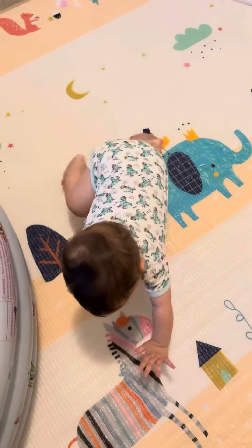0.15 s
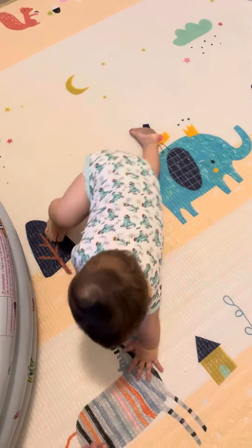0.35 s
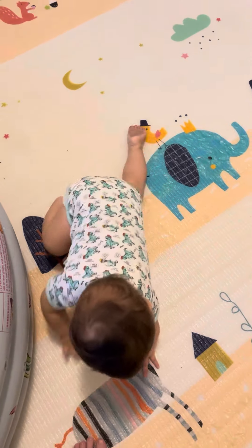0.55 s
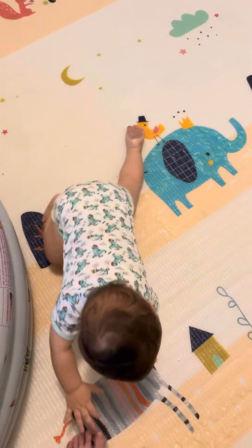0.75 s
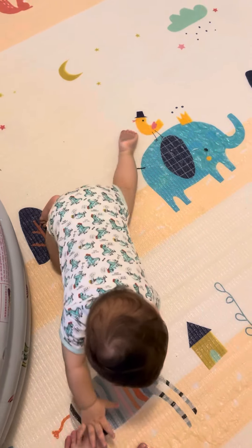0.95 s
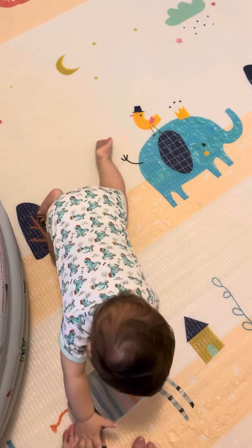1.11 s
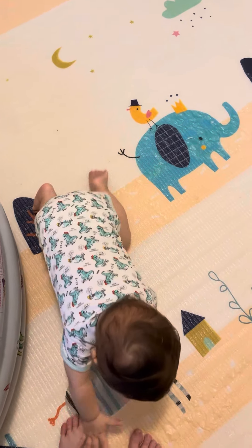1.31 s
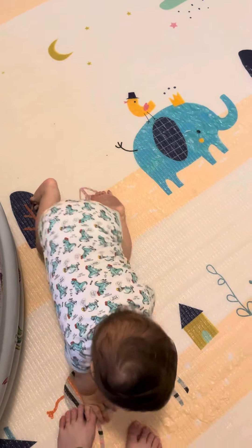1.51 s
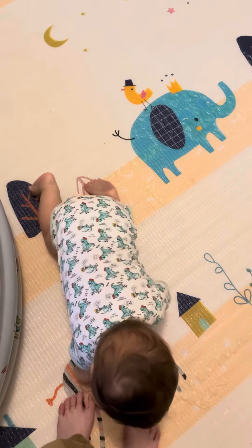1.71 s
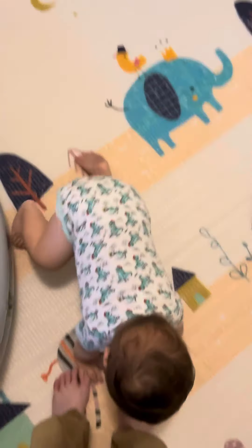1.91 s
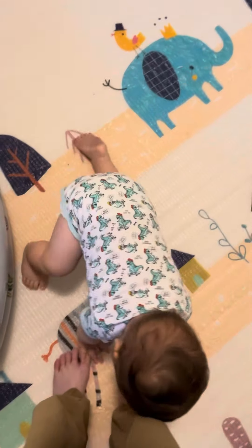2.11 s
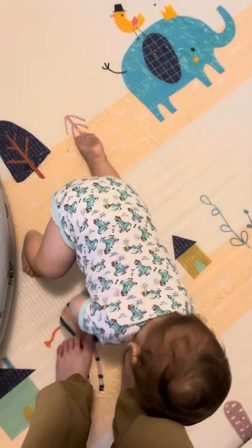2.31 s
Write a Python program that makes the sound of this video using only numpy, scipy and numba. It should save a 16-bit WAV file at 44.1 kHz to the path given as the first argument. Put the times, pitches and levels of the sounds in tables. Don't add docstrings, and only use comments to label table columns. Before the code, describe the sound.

Crawling thuds on a foam mat over a hollow floor, heard close in a quiet, softly humming room. Light scraping leads to a heavy, boomy palm slap at 0.25 s, then small pats until 0.7. Soft rubbing swells around 0.9-1.4, a moderate thud lands at 1.43, crisp skin peels near 1.7, brighter knocks at 1.9 and 2.07, and a last soft slap at 2.3.

```python
import sys
import numpy as np
from scipy import signal
from scipy.fft import rfft, irfft
from scipy.io import wavfile
from scipy.ndimage import uniform_filter1d
from numba import njit

SR = 44100
rng = np.random.default_rng(int(sys.argv[2]) if len(sys.argv) > 2 else 0)


def dump_mix(stems):
    frames = np.atleast_2d(stems).T
    limited = np.clip(frames, -1, 1)
    pcm = np.round(limited * 32767).astype(np.int16)
    wavfile.write(sys.argv[1], SR, pcm)


def level_to_linear(level):
    exponent = np.asarray(level, float) / 20
    return 10 ** exponent


N = 103635


def colour(x, points):
    freq_hz = np.maximum(np.arange(N // 2 + 1) * SR / N, 1)
    hz, db = np.array(points, float).T
    gain_db = np.interp(np.log(freq_hz), np.log(hz), db)
    return irfft(rfft(x) * level_to_linear(gain_db), N)


def unit(x):
    return x / np.sqrt(np.mean(x ** 2))


def walk(rate_hz):
    hold = int(SR / rate_hz)
    steps = np.repeat(rng.standard_normal(N // hold + 1), hold)
    smooth = uniform_filter1d(uniform_filter1d(steps, hold), hold)
    return 1.16 * smooth[:N]


@njit
def bandpass(x, centre_hz, width):
    y, band, low = np.empty(len(x)), 0., 0.
    for i in range(len(x)):
        g = np.tan(np.pi * centre_hz[i] / SR)
        v = (band + g * (x[i] - low)) / (1 + g * (g + width))
        band, low, y[i] = 2 * v - band, low + 2 * g * v, width * v
    return y


# frequency_hz, density_db [dB per Hz]
HUM_SPECTRUM = [(40, -5), (65, -4), (130, -5), (260, -3.5), (450, -14), (1500, -24.5), (6000, -29.5),
                (16000, -37)]


def hum():
    rumble = bandpass(rng.standard_normal(N), np.full(N, 66.), 0.36)
    air = colour(rng.standard_normal(N), HUM_SPECTRUM)
    level_db = -53.5 + 0.46 * walk(6.04)
    return (unit(air) + level_to_linear(-7) * unit(rumble)) * level_to_linear(level_db)


def grains(depth_db):
    size_db = depth_db * rng.exponential(size=N // 8 + 1).repeat(8)[:N]
    return unit(rng.standard_normal(N) * level_to_linear(size_db))


# frequency_hz, level_db
FOAM_SPECTRUM = [(200, -5), (700, -1), (1300, -3), (3000, -1.5), (5500, -7), (7500, -3), (11000, -10.5),
                 (16000, -17)]


def foam(excitation):
    return unit(colour(excitation, FOAM_SPECTRUM))


# start_s, level_db, centre_hz
SLIDE_PATH = [(0, -58, 3260), (0.142, -49, 3520), (0.202, -64, 3400), (.3, -58.5, 2220), (.46, -57.5, 2760),
              (.68, -66.5, 2150), (.88, -56, 2970), (1.02, -57, 2580), (1.13, -51.5, 2270),
              (1.32, -53.5, 2840), (1.36, -55.5, 2620), (1.62, -64.5, 2400), (1.72, -51, 3100),
              (1.808, -64.5, 2940), (1.873, -51, 3460), (2.02, -65.5, 2460), (2.1, -63, 2340),
              (2.27, -59, 2400)]
# start_s, level_db, centre_hz
SLIDE_LAST = (2.297, -51.5, 2800)


def slide():
    start_s, level_db, centre_hz = np.vstack([SLIDE_PATH, SLIDE_LAST]).astype(float).T
    t = np.arange(N) / SR
    friction = grains(1.2)
    centre = np.interp(t, start_s, centre_hz) * (1 + 0.09 * walk(24.54))
    rub = unit(bandpass(friction, centre, 0.45)) + level_to_linear(2.0) * foam(friction)
    catching_db = 1.66 * walk(40.07) + 0.89 * walk(13.97)
    return rub * level_to_linear(np.interp(t, start_s, level_db) - 2.5 + catching_db)


# start_s, peak_db, centre_hz, length_ms
SLAP_EVENTS = [(0.2426, -23.5, 877, 7.2), (0.2766, -33, 740, 9.5), (0.3068, -36, 1200, 9.3),
               (0.383, -47.5, 3530, 8), (0.4125, -39, 2870, 23), (0.4544, -43, 720, 15),
               (0.527, -42.5, 1190, 18), (0.557, -45.5, 4830, 17), (0.6078, -37.5, 730, 7.6),
               (0.7127, -35.5, 2150, 8.3), (1.121, -41, 1900, 8), (1.432, -32.5, 740, 15.5),
               (1.5019, -49, 834, 8), (1.66, -34, 5100, 15), (1.699, -37, 1740, 16.5),
               (1.7134, -32, 5200, 5.6), (1.7444, -46, 3600, 8), (1.8898, -25.5, 1850, 6),
               (2.0432, -41, 5380, 16), (2.0604, -35, 2620, 7.2), (2.0707, -28, 2060, 7.6),
               (2.1106, -40.5, 4900, 16), (2.1583, -36, 3120, 6.4), (2.2965, -30.5, 1930, 9.5),
               (2.3154, -37.5, 2550, 7.4)]


def slaps():
    rise_ms, width, crack_db = 3.86, 0.65, -3
    out = np.zeros(N)
    t = np.arange(N) / SR
    burst = grains(1.8)
    crack = level_to_linear(crack_db) * foam(burst)
    for start_s, peak_db, centre_hz, length_ms in SLAP_EVENTS:
        since_ms = (t - start_s) * 1000
        rise = np.clip(since_ms / rise_ms + 1, 0, 1)
        decay = np.exp(-np.maximum(since_ms, 0) / max(length_ms, 1))
        body = unit(bandpass(burst, np.full(N, 1. * centre_hz), width))
        out += level_to_linear(peak_db - 9.5) * rise * decay * (body + crack)
    return out


def mode(trough_s, hz, level_db, t60_s):
    push_cycles = 1.1
    t = np.arange(N) / SR - trough_s
    swell = np.sin(np.clip(1 + t * hz / push_cycles, 0, 1) * np.pi / 2) ** 2
    decay = level_to_linear(level_db - 60 * np.maximum(t, 0) / t60_s)
    return -decay * swell * np.cos(2 * np.pi * hz * t)


# start_s, boom_db, low_knock_db, knock_db, upper_knock_db
THUD_EVENTS = [
    (.242, -23.5, -25, -30, -34.5),
    (.60, -56.5, -54, -50.5, -63),
    (1.05, -52, -60.5, -59.5, -65),
    (1.434, -44, -43.5, -42, -53),
    (1.51, -43, -45.5, -50, -61),
    (1.72, -58, -55, -56, -52),
    (1.892, -41.5, -47.5, -54, -33.5),
    (2.068, -40, -54, -33.5, -48),
    (2.309, -53, -61, -55, -62),
]
# pitch_hz, level_db, t60_s, trough_delay_ms
FLOOR_MODES = [
    [(67.85, 2, 0.43, 23.45), (84, -7, 0.13, 22.2), (125.3, -3, 0.37, 23), (104.3, -2.5, .12, 22.1)],
    [(232.6, -0.5, 0.4, 5.65), (187.6, -1, 0.43, 6), (165.3, -5, 0.39, 11)],
    [(254.3, -0.5, 0.4, 5.01), (239.9, -6.5, 0.54, 4.74), (275, -11.5, 0.47, 5.1)],
    [(292.4, -4, 0.37, 3.98), (338, -2, 0.24, 3.95), (359.4, -6, 0.31, 3.07), (633, -12.5, 0.16, 2.08)],
]


def thuds():
    spot_db, detune = 1.5, 0.0082
    out = mode(THUD_EVENTS[0][0] + 0.00201, 715, -24.5, 0.018)
    for start_s, *levels_db in THUD_EVENTS:
        for group_db, group in zip(levels_db, FLOOR_MODES):
            for pitch_hz, level_db, t60_s, delay_ms in group:
                level_chance, pitch_chance = rng.standard_normal(2)
                hz = pitch_hz * (1 + detune * pitch_chance)
                db = group_db + level_db + spot_db * level_chance
                out = out + mode(start_s + delay_ms / 1000, hz, db, t60_s)
    return out


def room(near):
    t60_s, delay_s = 0.3, 0.004
    t = np.arange(SR // 2) / SR
    tail = rng.standard_normal(len(t)) * level_to_linear(-60 * t / t60_s) * (t > delay_s)
    wet = signal.fftconvolve(near, tail / np.sqrt(np.sum(tail ** 2)))[:N]
    return colour(wet, [(150, -12), (500, 0), (5170, -2), (16000, -10)])


# frequency_hz, lead_rad
PORT_PHASE = [(800, 0.62), (1900, 0.09), (2700, 1.5), (4300, 1.18), (5200, -0.36), (7000, 3.5), (8500, 3.5),
              (10200, 6), (12200, 7), (13300, 9), (14800, 10), (16000, 10)]
# frequency_hz, level_db
INCOHERENT_SIDE = [(100, -31.5), (300, -14.5), (700, -3.5), (1500, -4), (3000, -11.5), (5200, -12),
                   (8000, -22), (16000, -29)]


def two_ports(mono):
    smear_s = 0.015
    freq_hz = np.arange(N // 2 + 1) * SR / N
    port_hz, lead_rad = np.array(PORT_PHASE, float).T
    lead = np.interp(freq_hz, np.r_[0, port_hz], np.r_[0, lead_rad])
    turn = np.exp(.5j * lead)
    t = np.arange(SR // 10) / SR
    smear = rng.standard_normal(len(t)) * np.exp(-t / smear_s)
    smeared = signal.fftconvolve(mono, smear / np.sqrt(np.sum(smear ** 2)))[:N]
    side = colour(smeared, INCOHERENT_SIDE)
    spectrum = rfft(mono)
    return np.array([irfft(spectrum * turn, N) + side, irfft(spectrum / turn, N) - side])


def scene():
    near = thuds() + slaps() + slide()
    return two_ports(near + level_to_linear(-6.5) * room(near) + hum())


def top_cut(x):
    return signal.sosfilt(signal.butter(12, 16460, fs=SR, output="sos"), x)


def record(dry):
    bass_cut = signal.butter(4, 48, "high", fs=SR, output="sos")
    mix = signal.sosfilt(bass_cut, dry)
    return top_cut(mix)


dry = scene()
out = record(dry)
dump_mix(out)
```